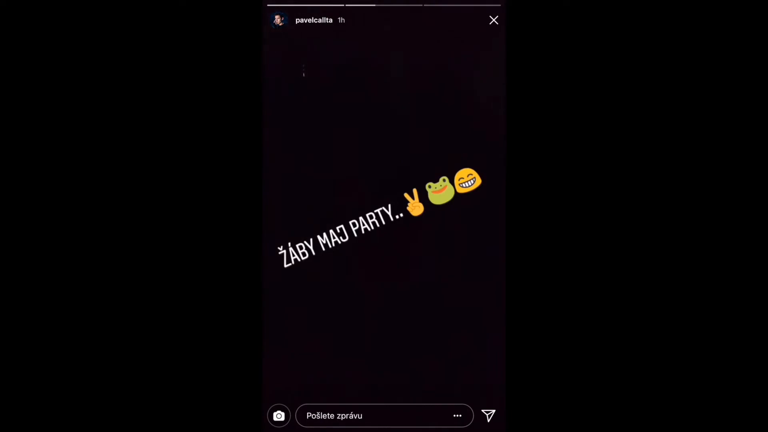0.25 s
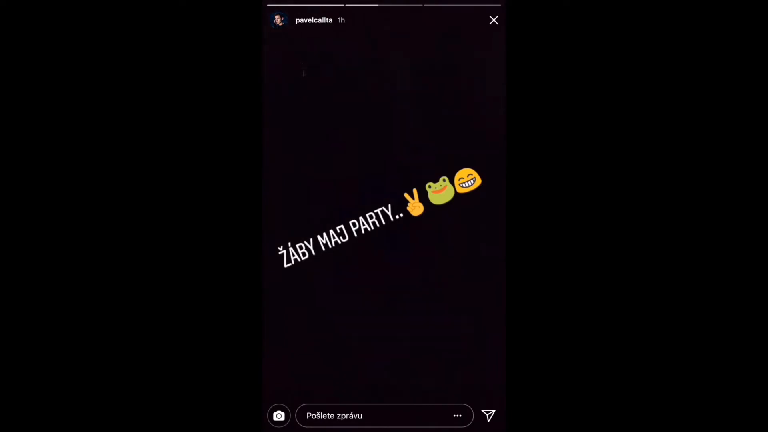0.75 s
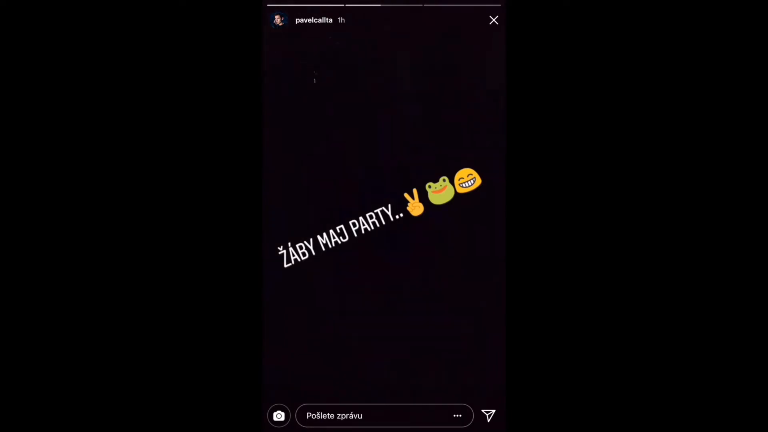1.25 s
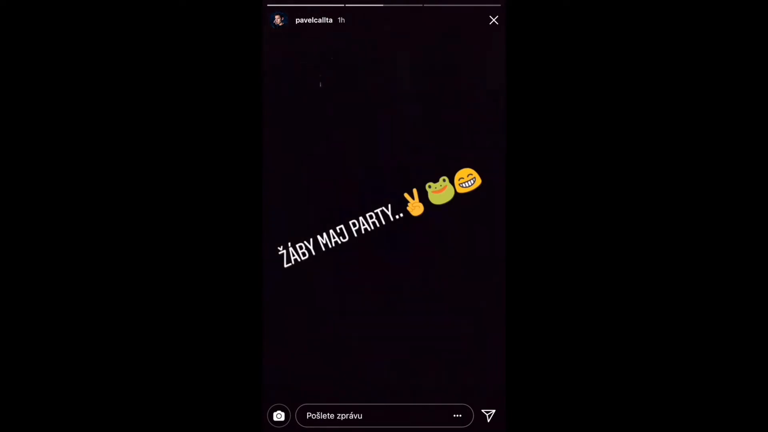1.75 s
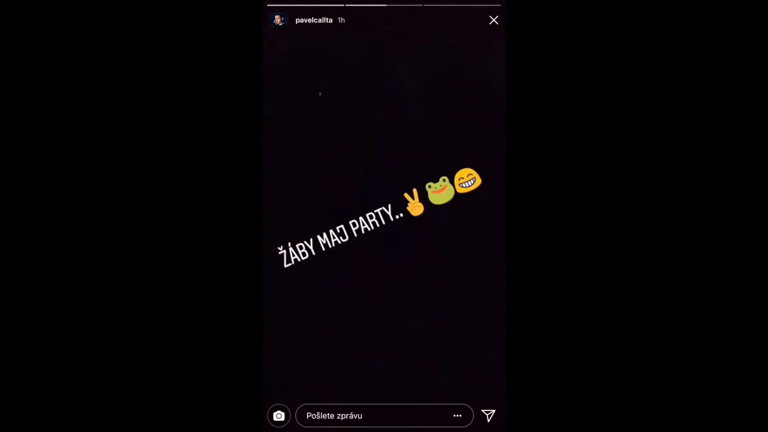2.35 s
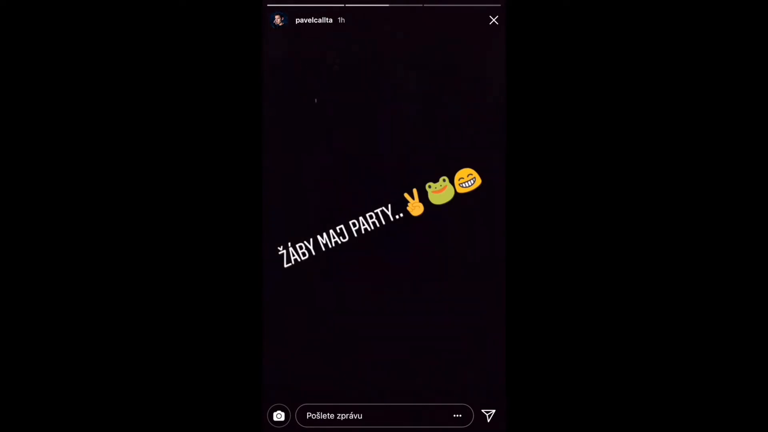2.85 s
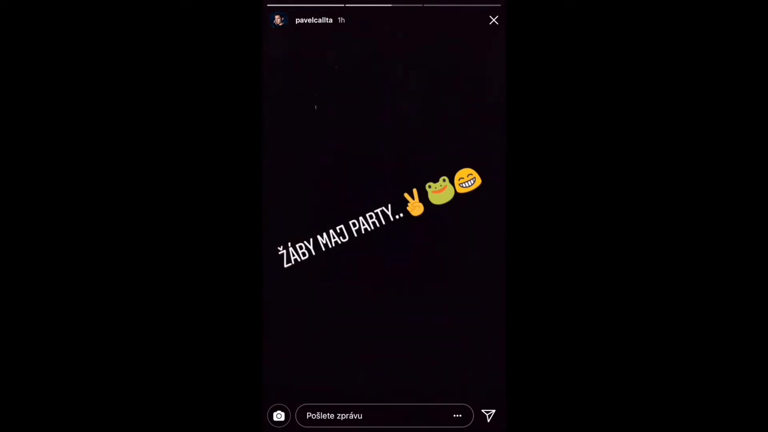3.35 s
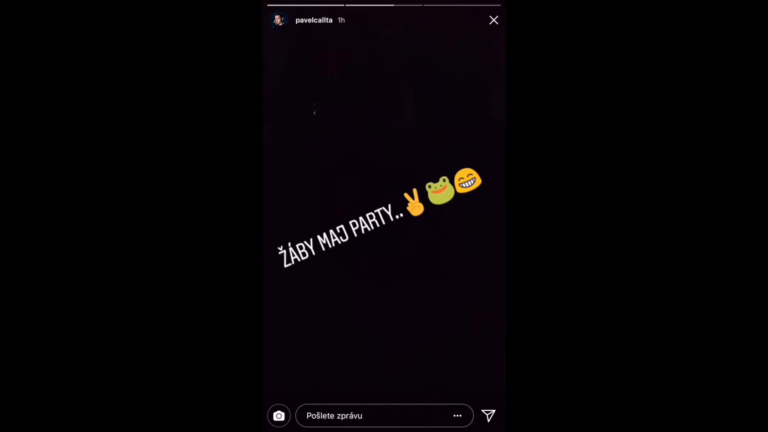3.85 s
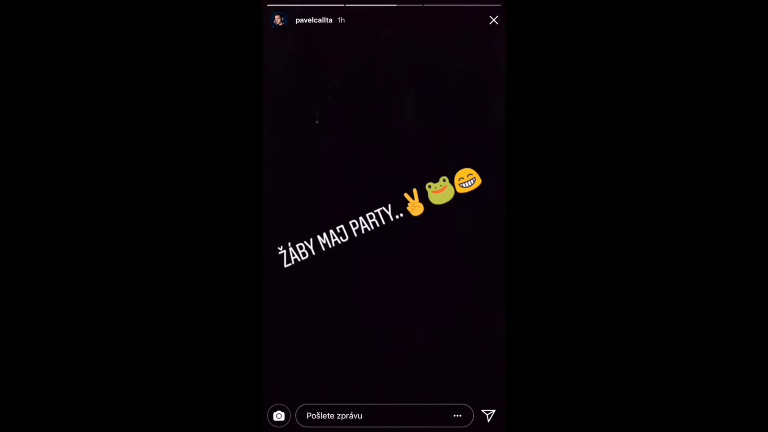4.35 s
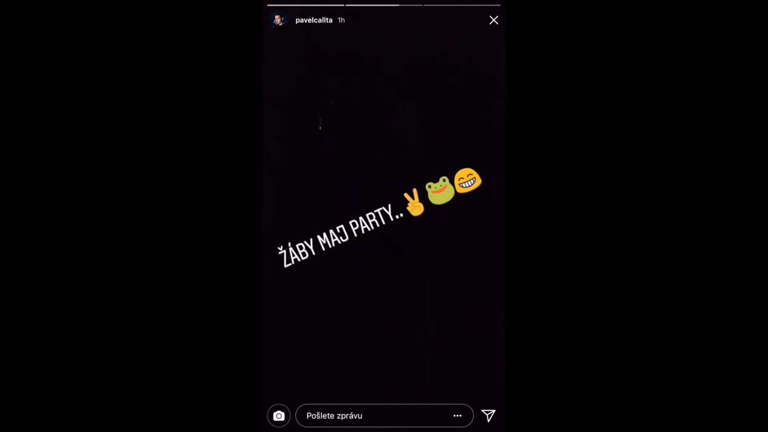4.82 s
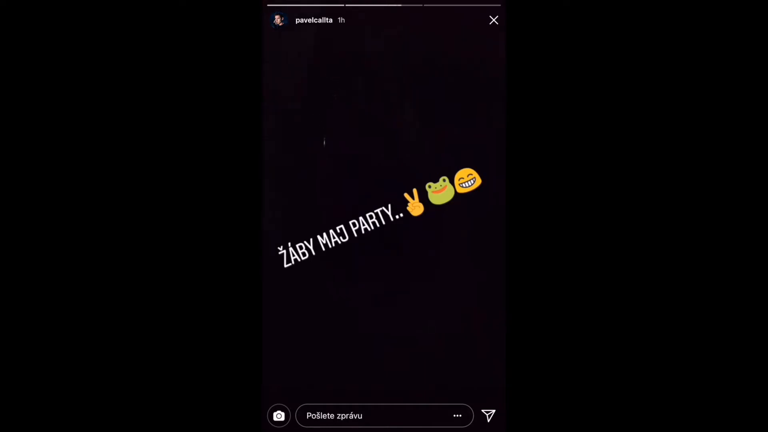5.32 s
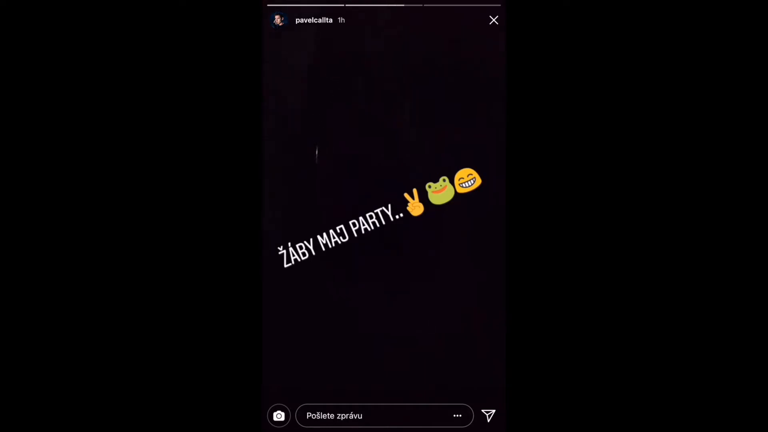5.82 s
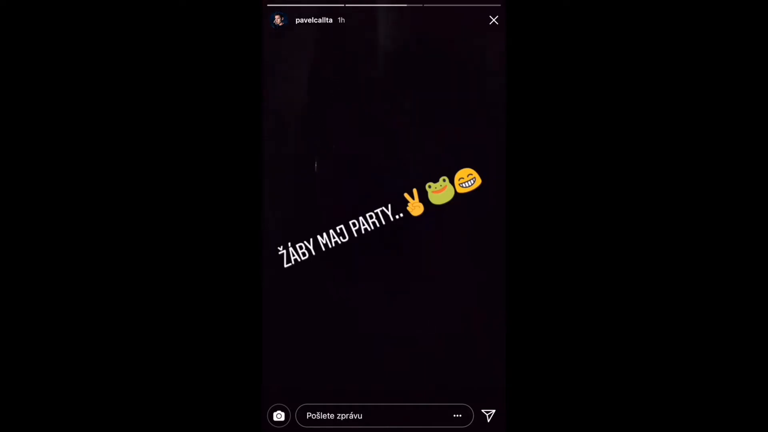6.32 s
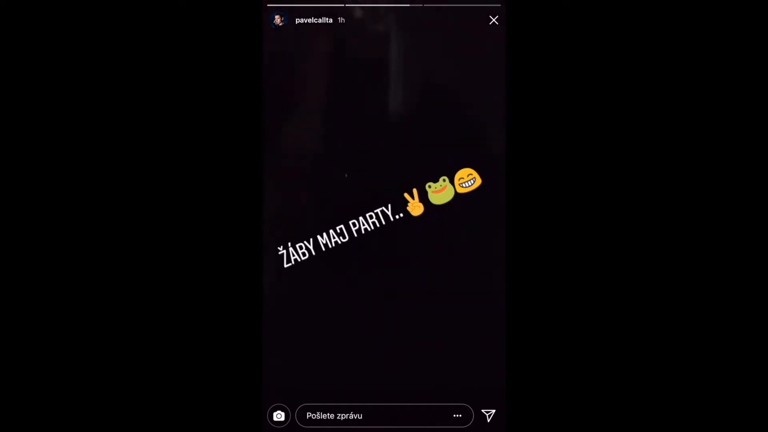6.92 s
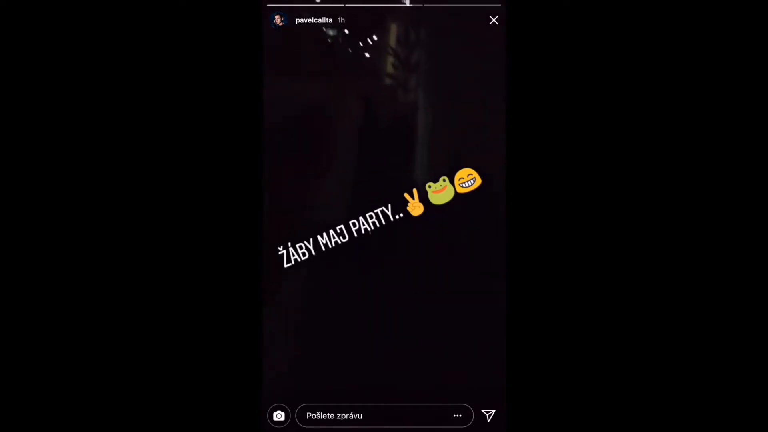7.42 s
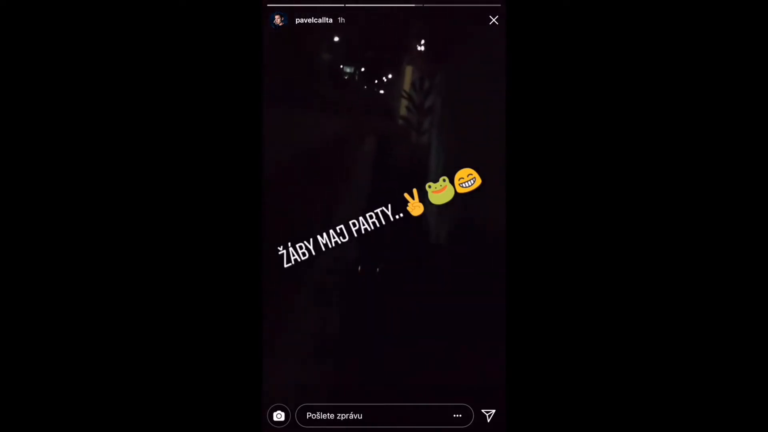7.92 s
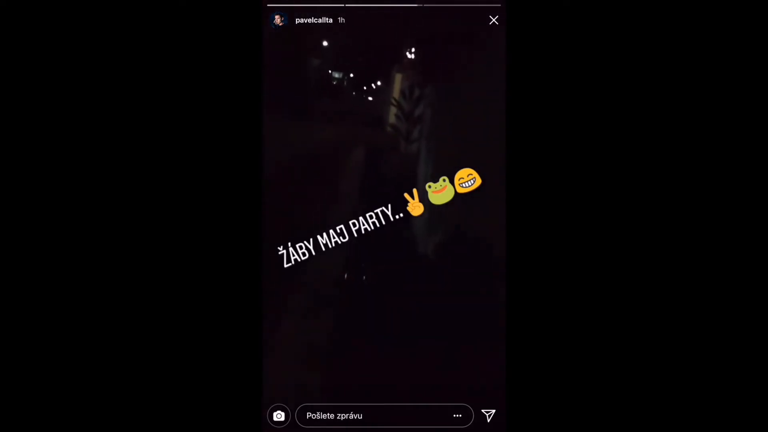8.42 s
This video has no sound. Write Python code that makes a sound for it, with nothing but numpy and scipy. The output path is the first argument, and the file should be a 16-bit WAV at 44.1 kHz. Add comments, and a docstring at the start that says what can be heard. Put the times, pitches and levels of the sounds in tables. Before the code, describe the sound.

At night a loud frog rattles close by over a farther frog chorus, with thin quick cricket chirps and a faint distant engine rumble.

```python
"""Frogs rattle in overlapping calls at a pond by night: each knock is a few vocal pulses ringing in throat, sac and head,
thrown back by banks and walls. A crowd of farther frogs, built from the same knocks, rattles on behind them.
A bush cricket chirps above in swells of filtered noise and falling whistles; a few dull thumps are decaying sines.
Distant traffic drones below as sines over shaped noise, one engine pulling away; faint night hiss lies under it all."""
import sys
import numpy as np
from scipy import signal
from scipy.fft import rfft, irfft
from scipy.io import wavfile
from scipy.ndimage import uniform_filter1d, map_coordinates

SR = 44100
rng = np.random.default_rng(int(sys.argv[2]) if len(sys.argv) > 2 else 0)


def bounce(signal):
    """Save signal as a 16-bit WAV file at the path given by the first command-line argument."""
    frames = np.transpose(np.atleast_2d(signal))
    limited = np.clip(frames, -1, 1)
    pcm = np.round(limited * 32767).astype(np.int16)
    wavfile.write(sys.argv[1], SR, pcm)


N = 382338

# cricket tempo: (time [s], chirps so far [count])
CHIRP_COUNT = [(.003, 0), (1.186, 9), (1.905, 15), (3.456, 27), (5.203, 41), (6.507, 51), (8.77, 68)]
# cricket loudness: (time [s], mean rasp level before the swell [dB], mean level of the last clear stroke [dB])
CRICKET_LEVELS = [(0, -65.5, -53), (4.5, -66, -56), (7.2, -64.5, -68), (7.6, -65, -47), (8.67, -76, -45.5)]
# two upper rings of a knock, mean level against it: (time [s], rasp before its band edges [dB], near 5 kHz [dB])
UPPER_RING_LEVELS = [(0, -13.5, -40), (.3, -15.5, -25), (.6, -17, -40), (1.45, -12, -46.5),
                     (1.75, -16.5, -27), (2.1, -15, -45), (2.8, -18, -43), (3, -5.5, -44),
                     (3.6, -19.5, -38.5), (4.4, -7.5, -47), (4.85, -6.5, -48), (5.1, -55, -39.5),
                     (5.7, -13.5, -45), (6.1, -17.5, -37), (6.6, -14, -71), (7.5, -9, -43),
                     (8.67, -31, -57)]


def from_db(db):
    """Decibels to linear gain."""
    return 10 ** (np.asarray(db) / 20)


def rms_one(x):
    """Scales a sound to rms 1."""
    return x / np.sqrt(np.mean(x ** 2) + 1e-20)


def in_time(rows):
    """Draws straight lines through timed rows: one curve a column."""
    s, *columns = np.transpose(rows)
    return [np.interp(np.arange(N) / SR, s, c) for c in columns]


def drift(rate):
    """Slow smooth chance, spread about 1, with this many random points a second."""
    knots = rng.standard_normal(int(N / SR * rate) + 3)
    return map_coordinates(knots, [np.arange(N) / SR * rate], order=3)


def chance(s, columns=1):
    """Random values of spread 1, one row for each event time."""
    return rng.standard_normal((len(s), columns))


def coloured(spectrum):
    """Noise shaped by (frequency [Hz], density [dB per Hz]) points; rms 1."""
    hz, db = np.transpose(spectrum)
    grid = np.fft.rfftfreq(N, 1 / SR) + 1
    gain = from_db(np.interp(np.log(grid), np.log(hz), db))
    return rms_one(irfft(rfft(rng.standard_normal(N)) * gain, N))


def band(x, low_hz, high_hz):
    """Steep band edges."""
    x = signal.sosfilt(signal.butter(6, low_hz, "high", fs=SR, output="sos"), x)
    return signal.sosfilt(signal.butter(8, high_hz, fs=SR, output="sos"), x)


def ring(t, hz, db, t60):
    """A mode struck at t = 0: a sine that loses 60 dB in t60 seconds."""
    t = np.maximum(t, 0)
    return from_db(db - 60 * t / t60) * np.sin(2 * np.pi * hz * t)


def place(s, sounds):
    """Adds each row of sounds at its time."""
    out = np.zeros(N + sounds.shape[1])
    at = np.clip((s * SR).astype(int), 0, N - 1)
    np.add.at(out, at[:, None] + np.arange(sounds.shape[1]), sounds)
    return out[:N]


def pond(x, tail_db, t60, dip):
    """Sparse decaying echoes from reeds and banks, a share (dip) of their middle band lost."""
    first_echo_s = 0.0081
    ground_dip_hz = (950, 1530)  # paths low over the water lose this band
    t = np.arange(SR // 2) / SR
    hits = rng.standard_normal(len(t)) * (rng.random(len(t)) < .02)
    echoes = hits * from_db(-60 * t / t60) * (t > first_echo_s)
    response = from_db(tail_db) * echoes / np.sqrt(np.sum(echoes ** 2))
    middle = signal.lfilter(*signal.butter(1, ground_dip_hz, "band", fs=SR), response)
    response = response - np.clip(dip, 0, 1) * middle
    response[0] = 1  # the direct sound
    return signal.fftconvolve(x, response)[..., :N]


def banks(x):
    """Adds a few separate echoes: near walls answer the near frogs."""
    # (delay [s], level against the direct sound [dB])
    wall_echoes = [(.0115, -16), (.0145, -19), (.0235, -18)]
    return x + sum(from_db(db) * np.pad(x, (int(s * SR), 0))[:N] for s, db in wall_echoes)


def air():
    """Shaped noise under the scene, its level flickering quickly by a few dB."""
    # (time [s], mean level [dB])
    hiss_level = [(0, -53), (7.5, -54), (8.1, -61), (8.67, -56.5)]
    # hiss colour: (frequency [Hz], relative density [dB per Hz])
    hiss_colour = [(300, 0), (500, -5.5), (2000, -1), (4000, -23), (6000, -29), (9000, -29), (11000, -38),
                   (14000, -42)]
    flicker_db = 3 * drift(19)
    return from_db(in_time(hiss_level)[0] + flicker_db) * coloured(hiss_colour)


def leaving_engine():
    """An engine pulling away: two orders of one gliding firing rate, fading in and out."""
    # (time [s], firing rate [Hz], first order rms level [dB], second order rms level [dB])
    pull_away = [(2.8, 44, -84, -63.5), (4.4, 52.44, -62, -48.5), (5, 57.5, -61, -56),
                 (6.15, 67.9, -60, -64), (6.6, 76.7, -59, -48.5), (7, 88.7, -48, -51.5),
                 (7.35, 98.3, -39.5, -49), (7.5, 103.8, -68, -66.5), (8, 86.8, -51.5, -64),
                 (8.5, 69, -60, -66)]
    s = np.arange(N) / SR
    hz, first_db, second_db = in_time(pull_away)
    turn = 2 * np.pi * np.cumsum(hz) / SR
    fade_in = np.clip((s - pull_away[0][0]) / 0.37, 0, 1)
    fade_out = np.clip((pull_away[-1][0] - s) / 0.069, 0, 1)
    orders = from_db(first_db) * np.sin(turn) + from_db(second_db) * np.sin(2 * turn)
    return np.sqrt(2) * fade_in * fade_out * orders * from_db(1.8 * drift(8))


def drone_engine():
    """A second, steadier engine: one throbbing low order that fades out."""
    # (time [s], pitch [Hz], mean rms level before the fade [dB])
    drone_course = [(0, 55.4, -49), (.7, 57.6, -49.5), (2.1, 59.7, -51), (2.7, 57.3, -54), (3.2, 62.9, -42),
                    (3.6, 68.6, -43.5), (4.15, 69.6, -40), (4.35, 51.5, -37.5), (4.9, 52.7, -42)]
    hz, db = in_time(drone_course)
    fade_out = np.clip((drone_course[-1][0] - np.arange(N) / SR) / 0.85, 0, 1)
    order = from_db(db) * np.sin(2 * np.pi * np.cumsum(hz) / SR)
    return np.sqrt(2) * order * fade_out * from_db(2.5 * drift(8.5))


def traffic():
    """Two engines as throbbing low orders, over road rumble of wavering low noise."""
    # road rumble: (time [s], mean level [dB])
    rumble_level = [(0, -52), (2.5, -53), (4.4, -55), (5.5, -57), (6.8, -51.5), (7.3, -47), (8, -59.5),
                    (8.67, -59)]
    # rumble colour: (frequency [Hz], relative density [dB per Hz])
    rumble_colour = [(15, -33), (25, 3.5), (81, 14.5), (120, 8.5), (184, 1.5), (394, -7), (450, -75),
                     (580, -71.5), (990, -120)]
    rumble = from_db(in_time(rumble_level)[0] + 2.6 * drift(6.2)) * coloured(rumble_colour)
    return leaving_engine() + drone_engine() + rumble


def strokes():
    """Three clear wing strokes a chirp, each a falling whistle, on average louder than the last."""
    start_hz, end_hz, length_s = 7510, 6500, .011
    grows_db, loudest_at = 8, -0.062  # growth per stroke; place of the loudest, in chirps
    when, chirps = np.transpose(CHIRP_COUNT)
    k, before = np.divmod(np.arange(3, 3 * chirps[-1]), 3)  # chirp number; strokes ahead of the loudest
    s = np.interp(k + loudest_at - before / 7.0, chirps, when) + 0.00065 * chance(k)[:, 0]
    last_db = np.interp(s, *np.transpose(CRICKET_LEVELS)[::2])
    db = last_db - grows_db * before + 4.0 * chance(k)[:, 0]
    u = np.linspace(0, 1, int(length_s * SR))
    hz = (start_hz + (end_hz - start_hz) * u) * (1 + 0.017 * chance(k))
    whistle = np.sin(2 * np.pi * np.cumsum(hz, axis=1) / SR)
    return place(s, from_db(db)[:, None] * np.sin(np.pi * u) * whistle)


def cricket():
    """Each chirp is a swell of wing strokes: noise rasps the wing's resonance, clear strokes echo."""
    chirp = (in_time(CHIRP_COUNT)[0] + .5) % 1  # place in the chirp, 0 to 1
    swell_db = np.interp(chirp, [0, .2, .42, .62, 1], [-20.5, 1.0, 5.0, -0.5, -2.5])
    throb_db = 4.8 * np.cos(2 * np.pi * 7 * (chirp - .42))  # seven beats a chirp
    wing = signal.butter(2, [6600, 7350], "band", fs=SR, output="sos")
    rasp = rms_one(signal.sosfilt(wing, signal.sosfilt(wing, rng.standard_normal(N))))
    rasp_db = in_time(CRICKET_LEVELS)[0] + swell_db + throb_db + 2.3 * drift(23)
    return rasp * from_db(rasp_db) + pond(strokes(), tail_db=0.5, t60=0.17, dip=0)


def thumps():
    """Short dull low knocks: a decaying sine with a soft start."""
    # (time [s], level of the ring at its strike [dB])
    thump_hits = [(1.341, -27), (4.549, -28), (4.592, -34), (5.045, -31.5), (6.999, -25.5)]
    s, db = np.transpose(thump_hits)
    t = np.arange(2200) / SR
    soft_start = 1 - np.exp(-(t / 0.00063) ** 2)
    return place(s, ring(t, 396, db[:, None], t60=0.026) * soft_start)


def calls():
    """Spells the near calls out as knocks in time order, one column per property of time, level and voice."""
    # runs of knocks whose gaps glide: (first knock [s], last knock [s], knocks [count], first gap [ms],
    #  last gap [ms], doubling delay [ms], single if 10 or less, first level [dB], last level [dB],
    #  sac first [Hz], sac last [Hz], throat [Hz], first sac level [dB], first sac overtone level [dB],
    #  head rings level [dB], first squeak [Hz], first squeak level [dB],
    #  loudest pulse of a knock [index], fall per pulse after it [dB])
    near_calls = [(.006, 0.1835, 6, 40.9, 23.6, 0, -8.5, -6.5, 727, 734, 1683, -33, -26, -23, 8940, -44, 0.04, 5.3),
                  (0.2286, 0.4734, 7, 45.3, 32.5, 0, -8.5, -11, 803, 788, 1830, -25, 5.5, -22.5, 9110, -35.5, 0.095, 3.3),
                  (0.532, 0.835, 10, 42.35, 25.6, 0, -17, -19, 716, 780, 1730, -19, 16, -24, 9600, -40.5, 0.35, 5.1),
                  (0.933, 1.4607, 14, 46.27, 23, 0, -6, -7.5, 606, 783, 1690, -24, -17, -22, 10030, -51, 0.28, 9.8),
                  (1.501, 1.926, 11, 50.7, 32.6, 1, -12, -12, 559, 780, 1610, -28.5, -32, -22, 9680, -40.5, 0.39, 1.75),
                  (1.974, 2.141, 6, 40.06, 27.5, 0, -13.5, -16.5, 800, 855, 1490, -34, 17, -23.5, 9330, -37, 0.6, 5.9),
                  (2.1733, 2.678, 13, 48.43, 32.6, 2, -6.5, -10, 742, 681, 1714, -24.5, -23, -25.5, 9920, -46.5, 0.3, 5.2),
                  (2.694, 2.866, 7, 36.84, 19, 0, -18.5, -26.5, 727, 736, 1620, -9.5, 8, -25, 9350, -45, 0.41, 4.2),
                  (2.894, 3.424, 13, 51.05, 31.8, 2, -13.5, -18, 523, 540, 1460, -18, 7, -18, 9960, -48.5, 0.41, 3.6),
                  (3.482, 3.639, 6, 33.93, 27.3, 0, -17, -18.5, 802, 838, 1530, -10.5, 16, -22.5, 9460, -38, 0.31, 7.4),
                  (3.684, 3.932, 4, 62.5, 68, 28, -15, -19, 703, 718, 1780, -8.5, 1.5, -25, 8530, -38.5, 0.26, 6.7),
                  (3.9985, 4.1324, 6, 36.47, 24, 0, -17.5, -35, 748, 707, 1790, -6, 20, -20.5, 8200, -58, 0.59, 5.9),
                  (4.313, 4.875, 14, 52.04, 33.7, -3, -13, -18.5, 524, 540, 1516, -15, 4.5, -19.5, 9640, -52, .3, 2.95),
                  (4.903, 5.114, 3, 117.6, 108, 32, -10.5, -13.5, 644, 663, 1685, -15, -1, -31, 8800, -65, 0.34, 5.5),
                  (5.1717, 5.738, 13, 60.68, 39, 0, -8.5, -10.5, 730, 740, 1686, -18.5, 0.5, -20.5, 10280, -54, 0.22, 9.7),
                  (5.8192, 6.13, 12, 35.2, 19.6, -2, -13, -21.5, 818, 873, 1532, -21, -3, -26, 9300, -38.5, 0.17, 2.2),
                  (6.225, 6.476, 7, 47.1, 37, 0, -31.5, -27.5, 711, 720, 1684, -30, -5, -22.5, 9300, -32, 0.19, 1.8),
                  (6.5072, 6.607, 3, 37.8, 70, 0, -9, -12.5, 599, 591, 1590, -13.5, -33, -18.5, 9840, -59, 1.8, 16),
                  (6.663, 7.11, 13, 45.1, 17.3, -13, -10, -16.5, 589.5, 596.5, 1674, -14, -38, -19.5, 9500, -40.5, 1.72, 13),
                  (7.2456, 7.761, 17, 50.94, 19.6, 9, -16.5, -21.5, 794, 830, 1800, -17.5, 11, -21, 10200, -47.5, 0.31, 3.9),
                  (7.848, 7.978, 5, 36.3, 25.4, 0, -35.5, -37, 733, 758, 1680, -26, 7, -22.5, 8450, -48, 1.42, 2.2),
                  (8.17, 8.588, 12, 54.6, 25, 0, -35, -41, 707, 850, 1890, -27, -29, -19, 9520, -43, 1.32, 2.9)]
    # knocks of other near frogs in a like voice: (time [s], level [dB])
    loose_knocks = [(0.036, -10.5), (0.097, -11), (0.135, -10), (0.144, -11), (0.236, -17), (0.502, -16),
                    (0.689, -10.5), (0.728, -12.5), (0.841, -19), (0.881, -28), (0.904, -22),
                    (1.481, -13.5), (1.524, -19), (1.953, -19.5), (2.954, -24), (3.035, -25), (3.074, -26),
                    (3.113, -23), (3.149, -19.5), (3.216, -19.5), (3.292, -20), (5.19, -12), (5.257, -15.5),
                    (5.767, -16.5), (5.777, -11), (8.123, -51), (8.648, -51)]
    first_knock_db, second_knock_db = -1.5, -0.8  # a call starts soft; the second of a pair
    sac_fills_db, overtone_grows_db = 5.5, -7  # over a call
    squeak_sinks_hz_per_s, squeak_grows_db_per_s = 4270, 41.5
    rows = []
    for (start, end, knocks, first_ms, last_ms, double_ms, first_db, last_db,
         sac_hz, sac_end_hz, throat_hz, sac_db, overtone_db, head_db,
         squeak_hz, squeak_db, loudest, fall_db) in near_calls:
        u = np.linspace(0, 1, round(knocks))  # place in the call
        bend = (len(u) - 1) * u * (1 - u) * (first_ms * (1 - u) - last_ms * u) / 1000
        s = start + (end - start) * u ** 2 * (3 - 2 * u) + bend
        db = first_db + (last_db - first_db) * u ** 2 + first_knock_db * (u == 0)
        voice = [loudest, fall_db, sac_hz + (sac_end_hz - sac_hz) * u, throat_hz,
                 sac_db + sac_fills_db * u, overtone_db + overtone_grows_db * u, head_db,
                 squeak_hz - squeak_sinks_hz_per_s * (s - start),
                 squeak_db + squeak_grows_db_per_s * (s - start)]
        rows += list(zip(*np.broadcast_arrays(s, db, *voice)))
        if double_ms > 10:
            seconds = np.broadcast_arrays(s + double_ms / 1000, db + second_knock_db, *voice)
            rows += list(zip(*seconds))
    rows.sort()
    # a loose knock borrows the voice of the call knock before it
    leaders = np.searchsorted([row[0] for row in rows], np.array(loose_knocks)[:, 0]) - 1
    rows += [(s, db, *rows[k][2:]) for (s, db), k in zip(loose_knocks, leaders)]
    return np.transpose(sorted(rows))


def squeak(hz, db, t60=.022):
    """A short high blip: a decaying sine with a soft start."""
    t = np.arange(900) / SR
    return ring(t, hz, db, t60) * (1 - np.exp(-(t / .0015) ** 2))


def high_ring(s, spread, scatter_db):
    """The ring near 5 kHz on each knock, its pitch and level scattered."""
    when, _, high_db = np.transpose(UPPER_RING_LEVELS)
    db = np.interp(s, when, high_db)[:, None] + scatter_db * chance(s)
    return squeak(4950 * (1 + spread * chance(s)), db, t60=0.019)


KNOCK_LEAD_S = .006  # room for the pulses ahead of the loudest


def vocal_pulses(s, sac_hz, loudest, fall_db, scatter_db):
    """Eight impulses a knock, about one sac period apart, rising to the loudest and falling after it."""
    count, rise_db, jitter = 8, 2, .035  # pulses; rise per pulse; share of a sac period
    k = np.arange(count) - np.clip(loudest, 0, 3)
    lags = np.maximum(KNOCK_LEAD_S + (k + jitter * chance(s, count)) / sac_hz, 0)
    shape_db = np.minimum(rise_db * k, -np.abs(fall_db) * k)
    pulses = np.zeros((len(s), 1400))
    at = (np.arange(len(s))[:, None], (lags * SR).astype(int))
    np.add.at(pulses, at, from_db(shape_db + scatter_db * chance(s, count)))
    return pulses


def knock(s, spread, scatter_db, size):
    """Vocal pulses ring throat (peak 1), sac and head in the leading near frog's voice; one row a knock."""
    # broad rings beside the throat: (mean pitch [Hz], relative level [dB], t60 [s])
    mouth_modes = [(1200, -14, 0.05), (1301, -12.5, 0.044), (1878, -2.5, 0.027)]
    # rings of a frog's head: (mean pitch [Hz], relative level [dB], t60 [s])
    head_modes = [(3080, -4.5, 0.02), (3588, -6, 0.022), (3987, -8.5, 0.017)]
    # gain of the two mouth rings near 1.25 kHz: (time [s], gain [dB])
    low_mouth_gain = [(0, -3.5), (1.5, -3), (2.8, 1.2), (3, -10), (3.7, .1), (4.4, -7.5), (4.95, -0.5),
                      (5.8, 0.5), (6.5, -11.5), (7.2, -9), (8.3, 13)]
    faint_db = -22  # below this level a call is far
    narrowing, blurring = .9, .65  # dB per dB below it: side rings weaken, the throat ring lengthens
    mouth_spread, head_spread, ring_scatter_db = .03, .07, 3  # shares of pitch; level, knock to knock

    start, *voice, _, _ = calls()
    leader = np.maximum(np.searchsorted(start, s, "right") - 1, 0)
    voice = [column[leader, None] for column in voice]
    db, loudest, fall_db, sac_hz, throat_hz, sac_db, overtone_db, head_db = voice
    sac_hz = sac_hz / size * (1 + spread * chance(s))
    throat_hz = throat_hz * (1 + spread * chance(s))
    t = np.arange(2200) / SR

    def side_rings(modes, pitch_spread):
        """Rings of the modes, pitch and level scattered from knock to knock."""
        return [ring(t, hz * (1 + pitch_spread * chance(s)), level + ring_scatter_db * chance(s), t60)
                for hz, level, t60 in modes]

    mouth = side_rings(mouth_modes, mouth_spread)
    low_mouth = from_db(np.interp(s, *np.transpose(low_mouth_gain)))[:, None] * (mouth[0] + mouth[1])
    sides = from_db(narrowing * np.minimum(db - faint_db, 0)) * (low_mouth + mouth[2])
    main = ring(t, throat_hz, 0, 0.019 * from_db(blurring * np.maximum(faint_db - db, 0)))
    overtone = ring(t, 2 * sac_hz, overtone_db, 0.0048)
    throat = band(main + overtone + sides, 597, 1867)
    sac = band(ring(t, sac_hz, sac_db, 0.026) * np.linspace(1, 0, len(t)), 636, 1420)
    rasp_db = np.interp(s, *np.transpose(UPPER_RING_LEVELS)[:2])[:, None]
    rasp_db = rasp_db + ring_scatter_db / 2 * chance(s)
    rasp = band(ring(t, 2500 * (1 + mouth_spread * chance(s)), rasp_db, .008), 2693, 3460)
    head = rasp + from_db(head_db) * band(sum(side_rings(head_modes, head_spread)), 2870, 3744)

    pulses = vocal_pulses(s, sac_hz, loudest, fall_db, scatter_db)
    parts = np.array([throat, sac, head])
    throat, sac, head = signal.fftconvolve(parts, pulses[None], axes=2)[..., :len(t)]
    return throat / np.abs(throat).max(axis=1, keepdims=True), sac, head


def evened(x):
    """Divides by the slow level, so the sound stays near rms 1."""
    return x / np.sqrt(uniform_filter1d(x ** 2, SR // 3) + 1e-12)


def far_frogs(count=4):
    """Several frogs, each with its own rate, sac size and drifting effort, rattle around the leader's pitch."""
    throats, sacs = 0, 0
    for size in np.linspace(.86, 1.16, count):
        knocks_per_s = rng.uniform(21, 31) * from_db(.8 * drift(1.5))
        beats = np.cumsum(knocks_per_s) / SR + rng.random()
        at = np.flatnonzero(np.diff(np.floor(beats)))
        s = at / SR
        throat, sac, head = knock(s, spread=0.028, scatter_db=9.5, size=size)
        effort = from_db(4 * drift(3))[at, None]
        along = beats[at, None] / 14 % 1  # place in a call of 14 knocks
        squeak_hz = (9900 - 2300 * along) * (1 + .02 * chance(s))
        blips = squeak(squeak_hz, -50 + 6 * along + 5 * chance(s))
        blips = blips + high_ring(s, spread=0.12, scatter_db=4)
        throats = throats + place(s - KNOCK_LEAD_S, effort * (throat + from_db(-9) * head))
        throats = throats + place(s, effort * blips)
        sacs = sacs + place(s - KNOCK_LEAD_S, effort * sac)
    return evened(throats), evened(sacs)


def crowd():
    """The farther frogs, throats and sacs each riding their own level, with echoes."""
    # before the 3 dB lift and the echoes: (time [s], throat level [dB], sac level [dB])
    crowd_levels = [(0, -31.5, -34), (.5, -32.5, -51), (.85, -32.5, -41), (1.5, -33, -40.5),
                    (2.7, -34, -42), (2.85, -39.5, -58), (3.3, -33.5, -46), (3.8, -34.5, -60),
                    (4.2, -47.5, -56), (4.6, -36.5, -43.5), (4.97, -43.5, -60.5), (5.2, -32, -35.5),
                    (6.05, -39, -49.5), (6.22, -49.5, -78), (6.47, -49, -57), (6.8, -40.5, -39.5),
                    (7.18, -44, -53.5), (7.7, -38, -66), (8.1, -58.5, -63.5), (8.45, -46, -73)]
    throat_db, sac_db = in_time(crowd_levels)
    throats, sacs = far_frogs()
    mix = from_db(throat_db) * throats + from_db(sac_db) * sacs
    return from_db(3) * pond(mix, tail_db=-3, t60=.3, dip=0.16)


def near_frogs():
    """Each knock carries a tick near 7 kHz, a ring near 5 kHz and a squeak that sinks and grows through the call."""
    s, db, *_, squeak_hz, squeak_db = calls()
    throat, sac, head = knock(s, spread=0.008, scatter_db=1.8, size=1)
    tick = squeak(7300 * (1 + 0.026 * chance(s)), -41 + 4 * chance(s))
    thin_squeak = squeak(squeak_hz[:, None] * (1 + 0.032 * chance(s)),
                         squeak_db[:, None] + 3.7 * chance(s))
    blips = tick + thin_squeak + high_ring(s, spread=0.1, scatter_db=5.4)
    gain = from_db(db[:, None] + 0.27 * chance(s))  # slightly uneven knocks
    knocks = place(s - KNOCK_LEAD_S - .0015, gain * (throat + sac + head))
    return knocks + place(s - .002, gain * blips)


def scene():
    """Mixes hiss, traffic, cricket, thumps and the far and near frogs to one channel."""
    frogs = pond(banks(near_frogs()), tail_db=-10.5, t60=0.3, dip=0.33)
    return (air() + traffic() + cricket() + thumps() + crowd() + frogs)[None]


def record(dry):
    """Cuts the top steeply: 70 dB down from 13.7 kHz up."""
    return signal.sosfilt(signal.cheby2(12, 70, 13700, fs=SR, output="sos"), dry)


dry = scene()
out = record(dry)
bounce(out)
```